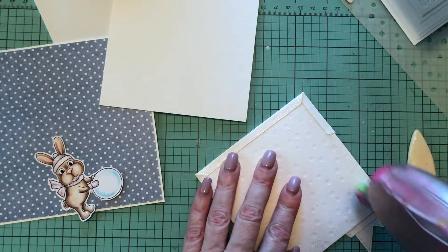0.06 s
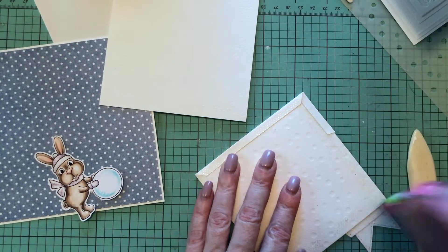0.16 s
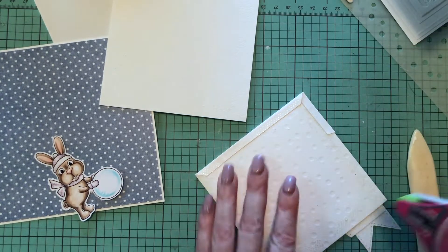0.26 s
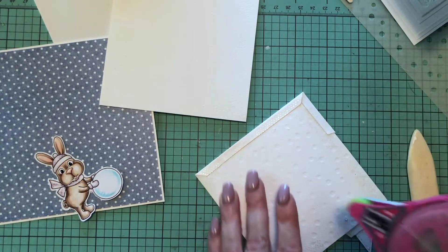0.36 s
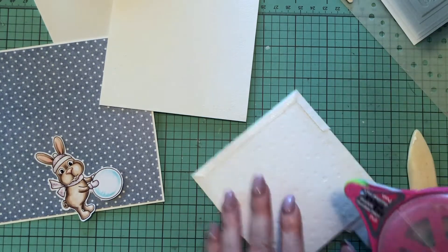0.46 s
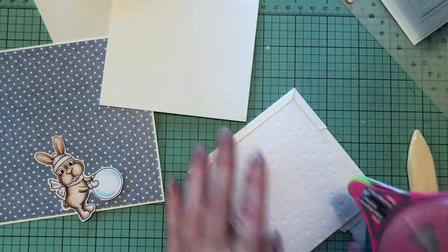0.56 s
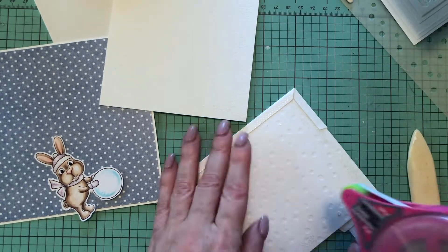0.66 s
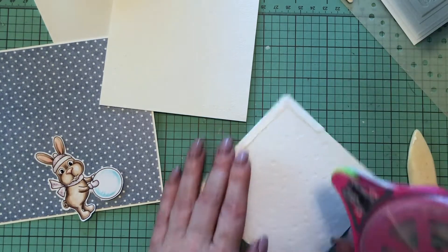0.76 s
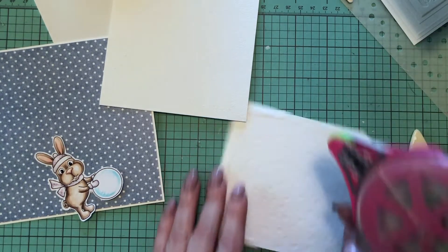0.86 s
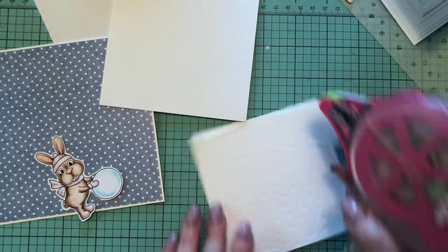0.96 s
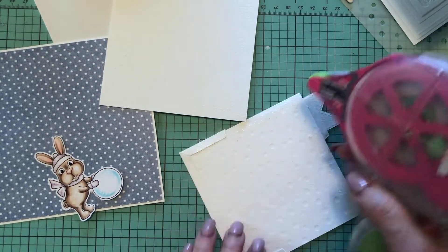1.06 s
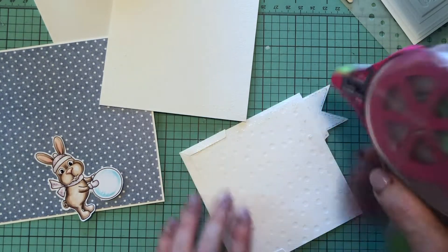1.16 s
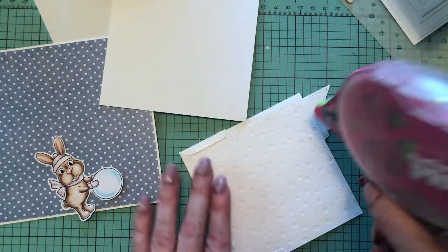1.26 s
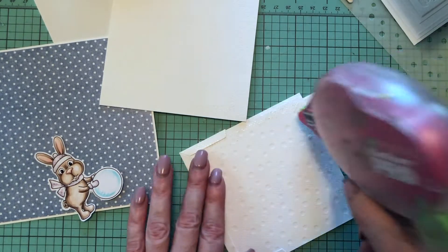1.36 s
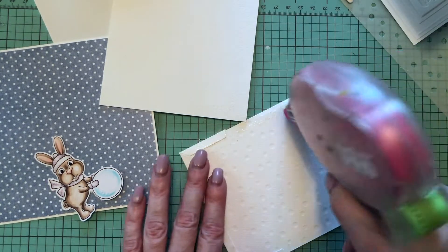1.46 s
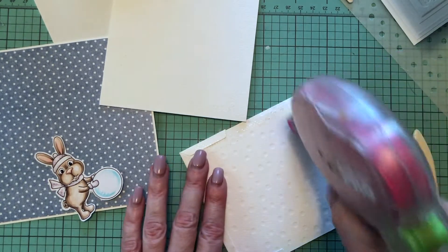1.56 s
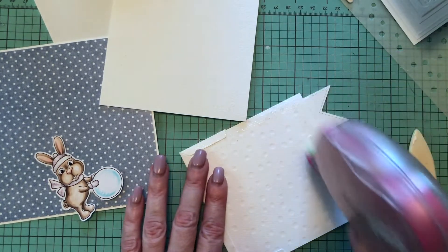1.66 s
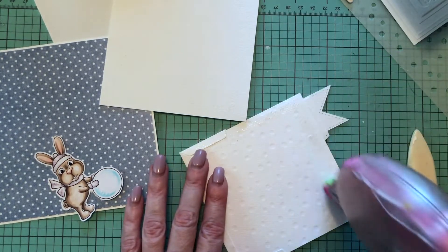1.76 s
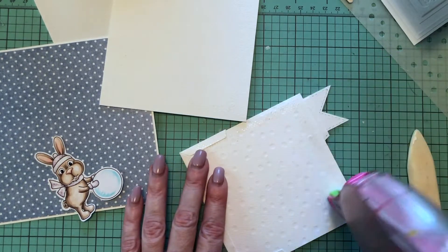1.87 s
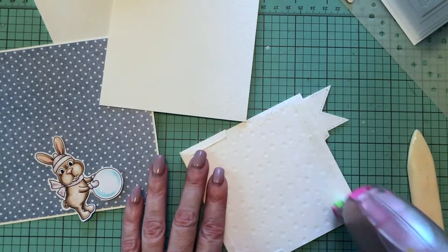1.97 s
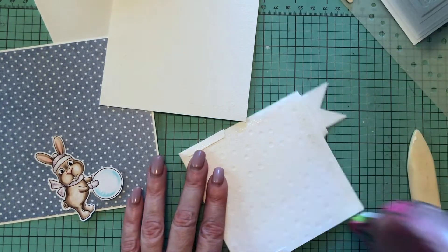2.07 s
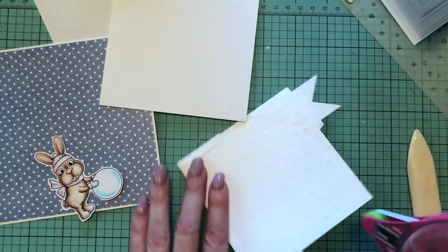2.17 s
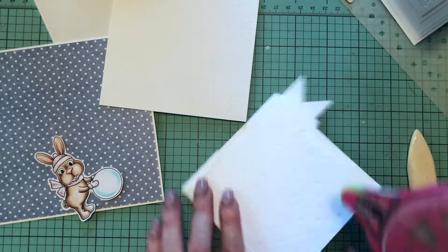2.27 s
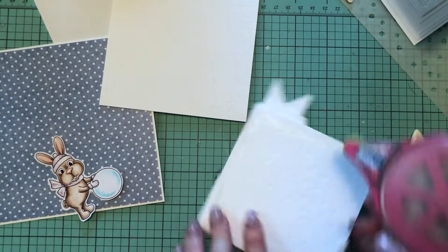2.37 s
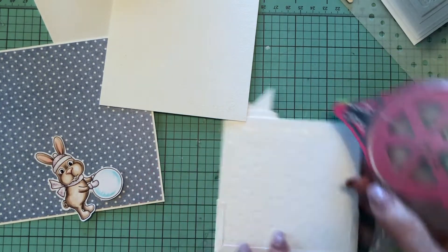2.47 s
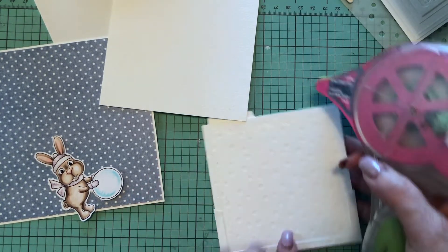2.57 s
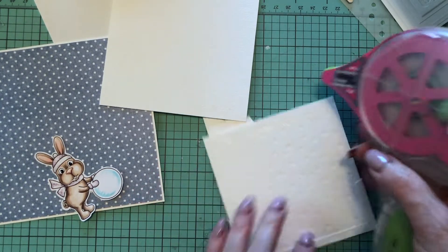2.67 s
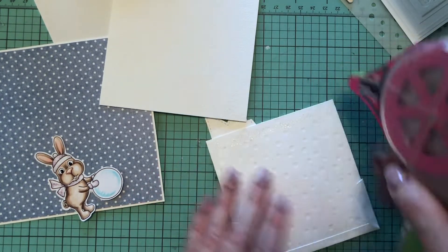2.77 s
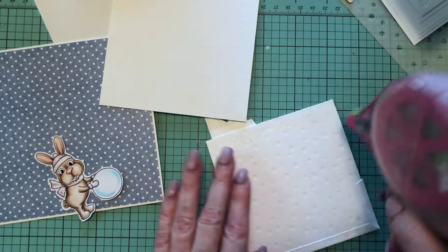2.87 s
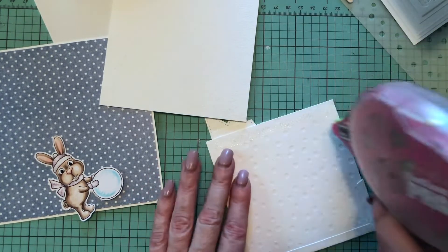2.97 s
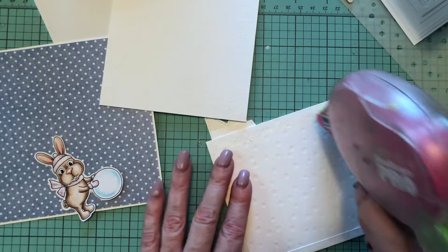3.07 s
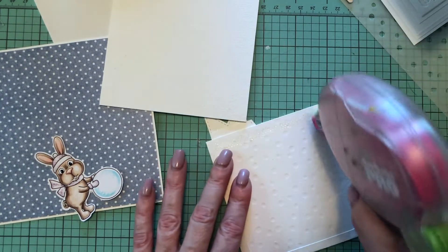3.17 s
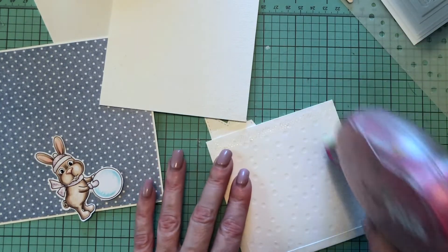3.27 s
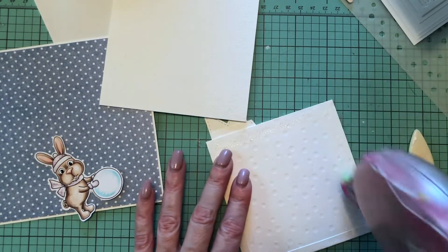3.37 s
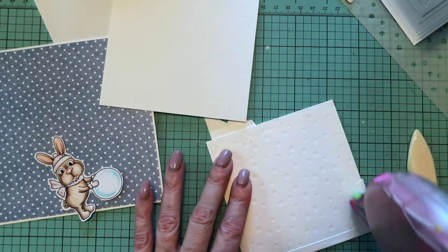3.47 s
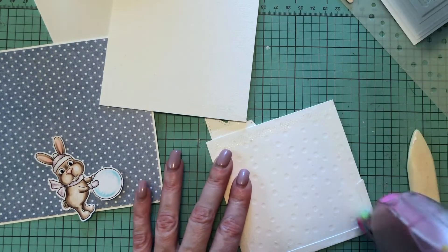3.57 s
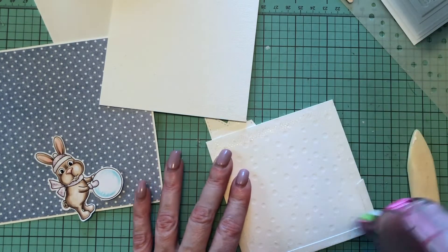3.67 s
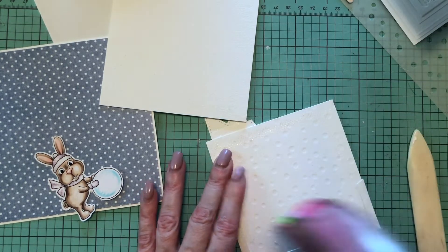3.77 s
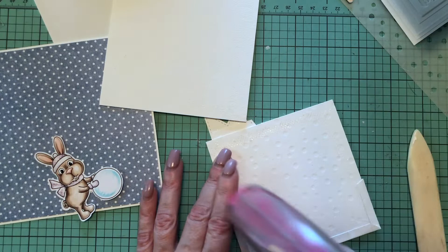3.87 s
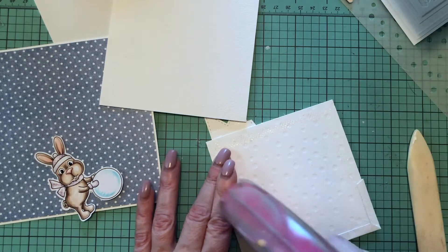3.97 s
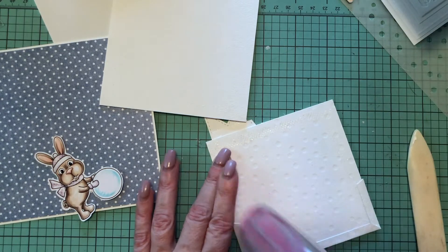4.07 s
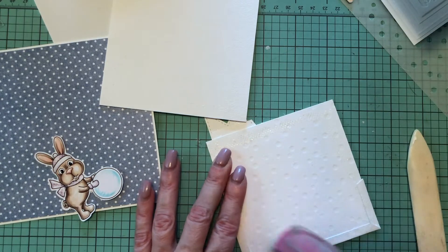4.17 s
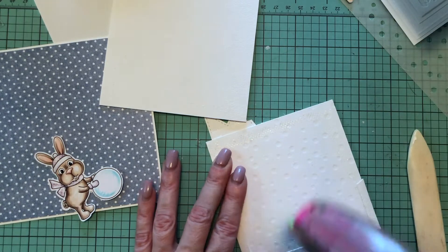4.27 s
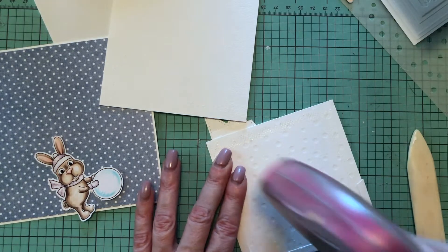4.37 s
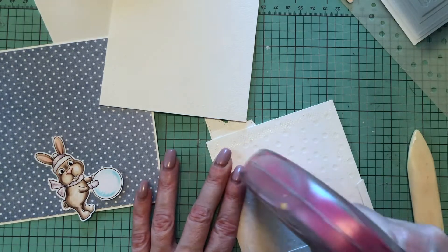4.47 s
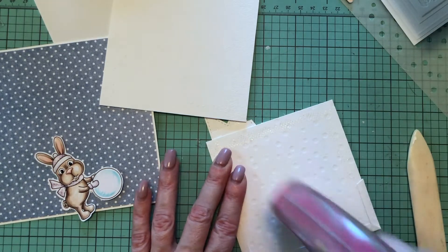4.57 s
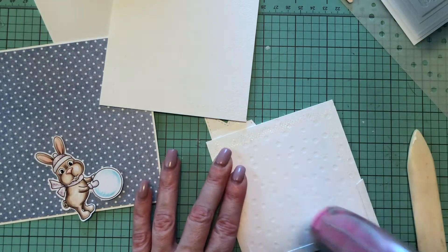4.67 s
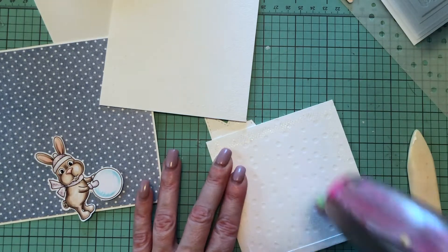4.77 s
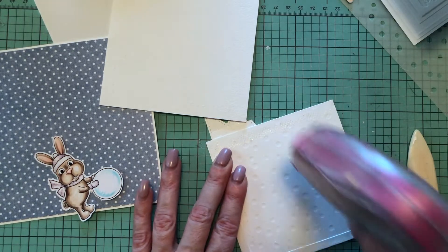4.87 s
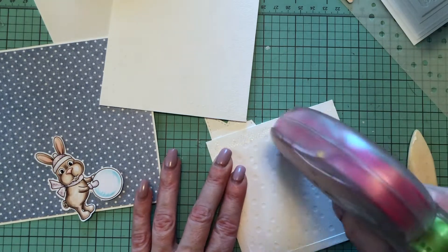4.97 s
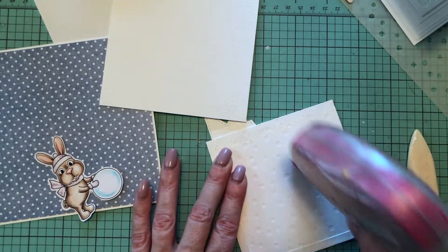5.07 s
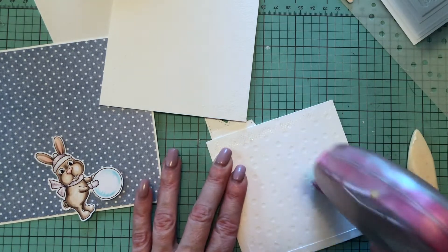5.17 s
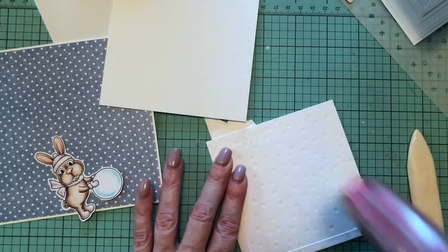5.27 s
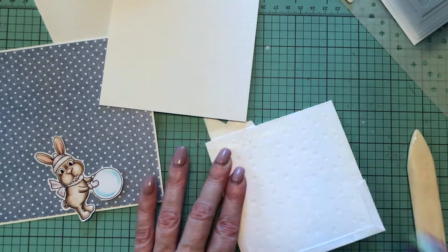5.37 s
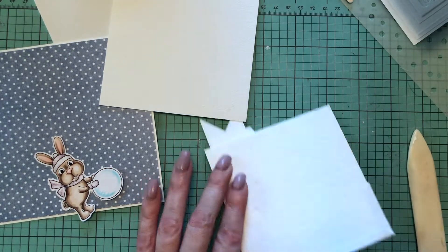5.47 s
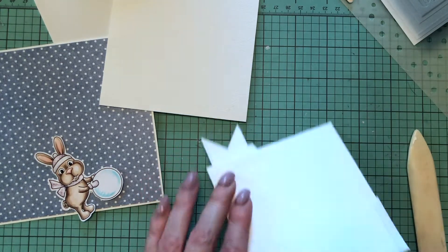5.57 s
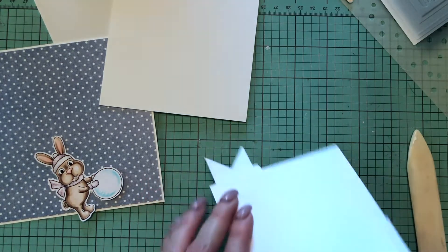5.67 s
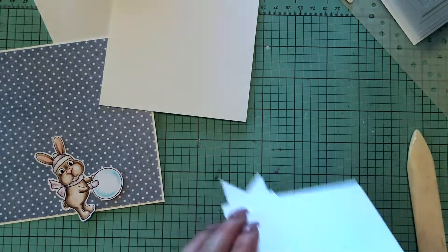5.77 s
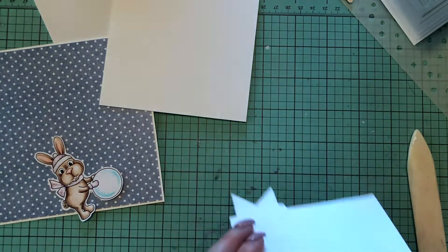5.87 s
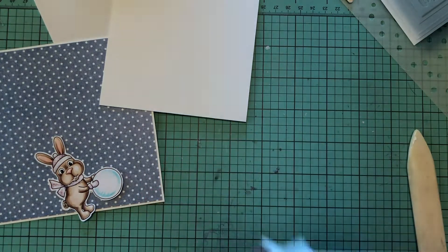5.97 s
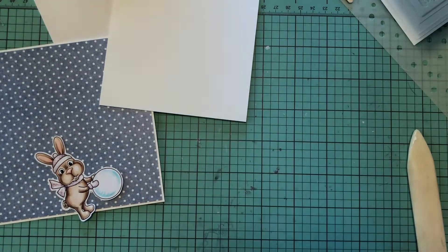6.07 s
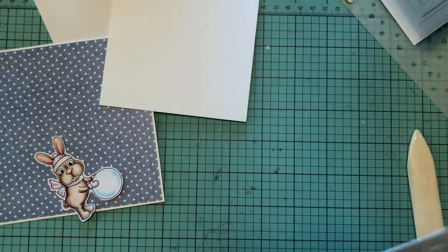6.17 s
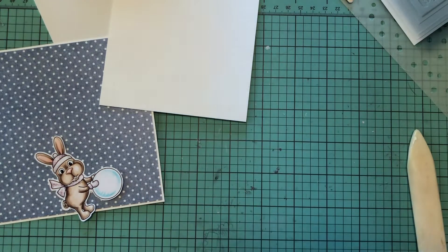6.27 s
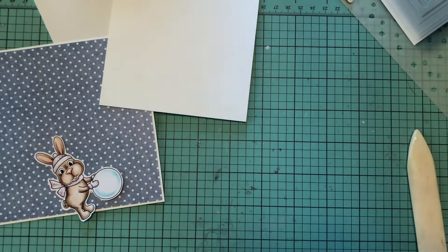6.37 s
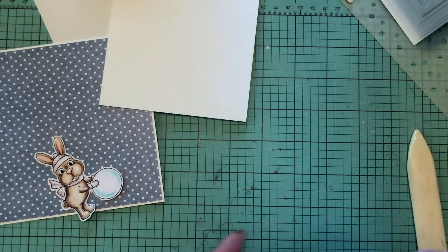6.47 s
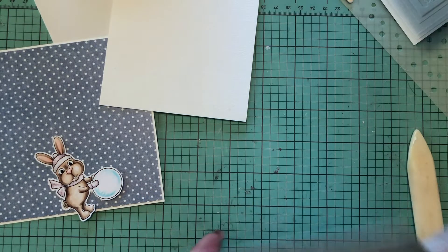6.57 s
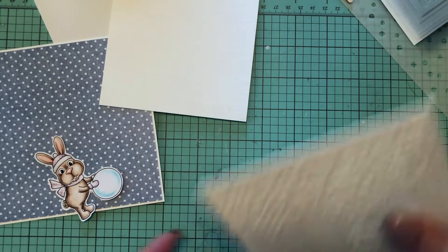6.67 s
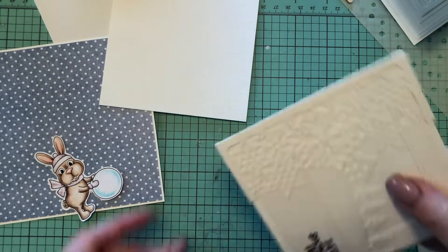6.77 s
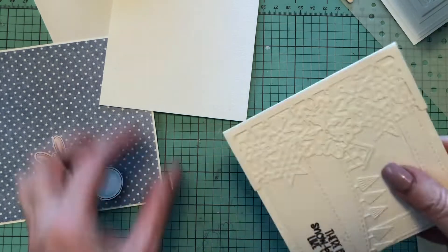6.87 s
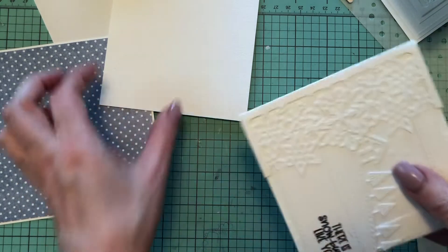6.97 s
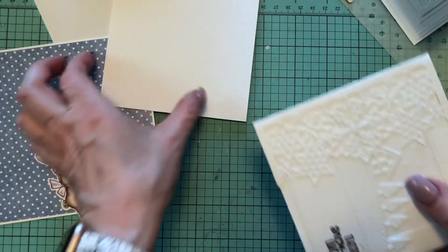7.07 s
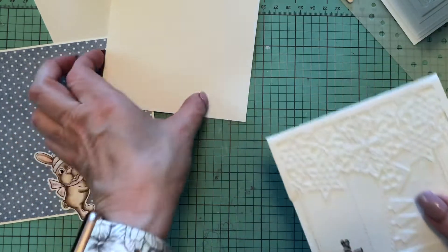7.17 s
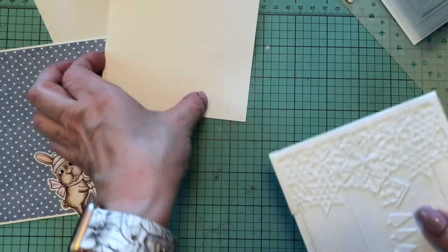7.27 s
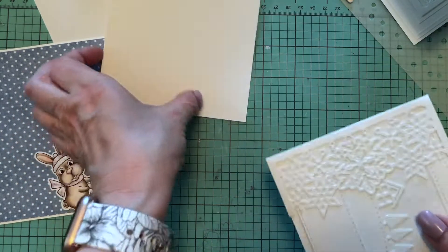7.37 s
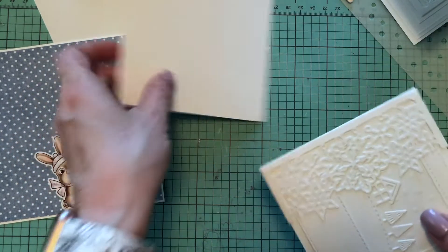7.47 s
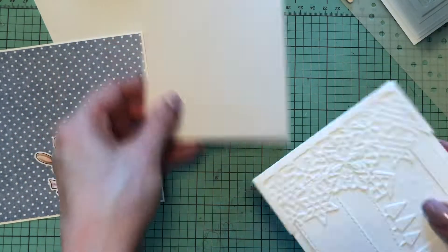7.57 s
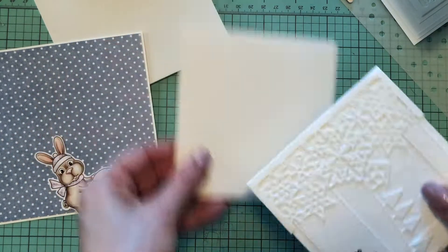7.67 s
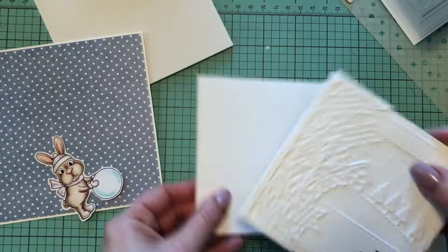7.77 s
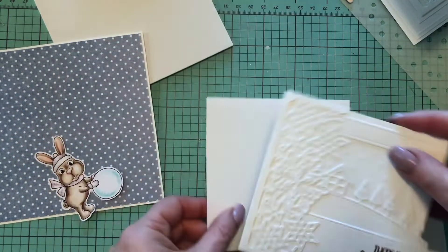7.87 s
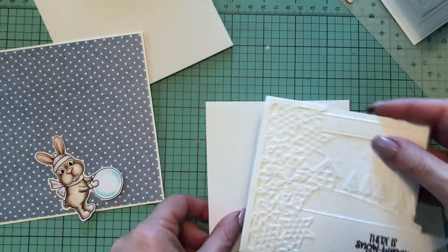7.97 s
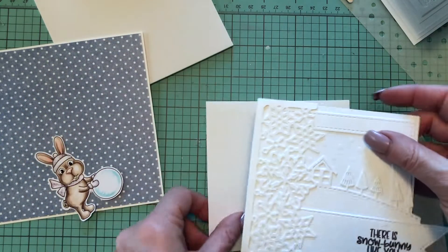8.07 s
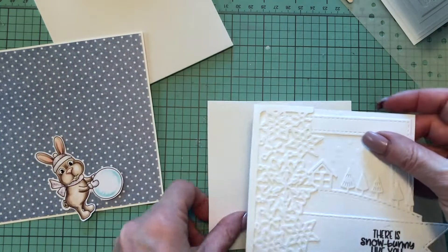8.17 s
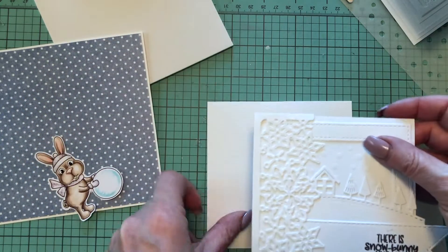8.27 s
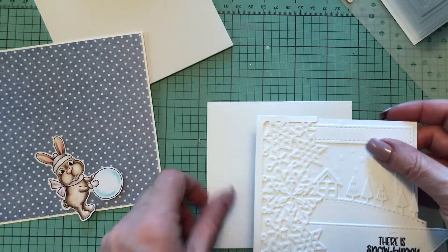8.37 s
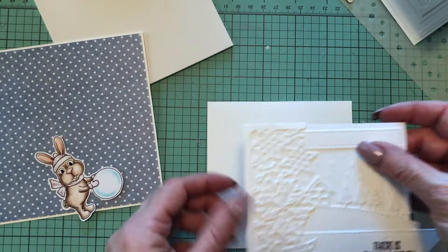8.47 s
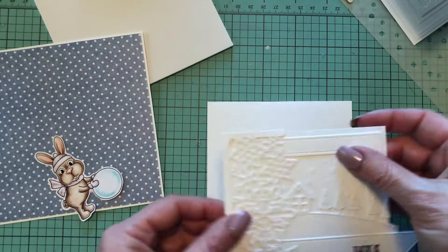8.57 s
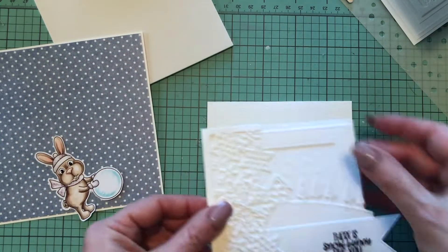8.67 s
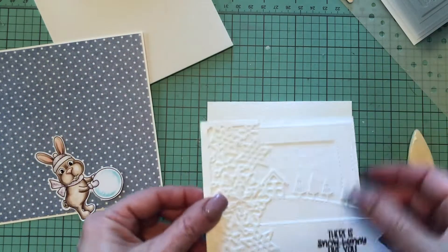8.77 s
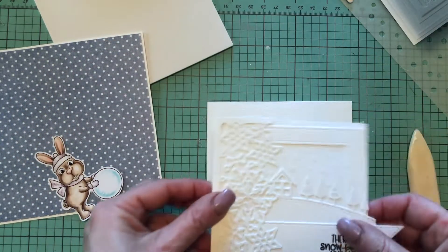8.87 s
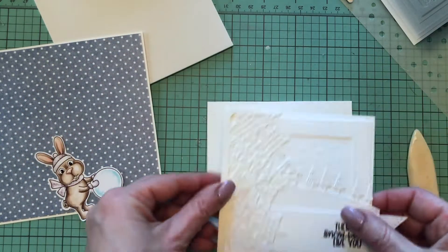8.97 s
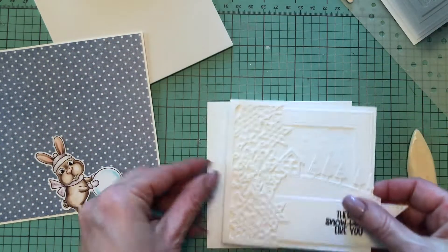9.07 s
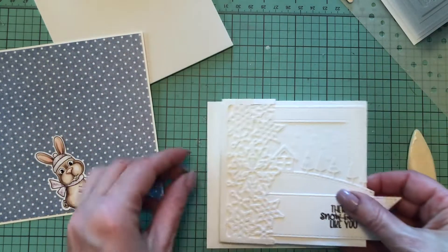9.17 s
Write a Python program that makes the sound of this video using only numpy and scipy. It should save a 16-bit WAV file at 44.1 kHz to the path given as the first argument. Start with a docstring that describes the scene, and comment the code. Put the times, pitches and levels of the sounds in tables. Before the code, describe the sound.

A close microphone in a small, quiet room, with a faint steady hush throughout. At 0 s a hollow plastic tape gun thuds onto card and makes a quick ratcheting zip, ending in a click at about 0.2. Card taps and brushes softly as it is turned, from 0.2 to 1.3. Two more zips follow at 1.5 to 2.1, gritty with peeling tape. Card slides and knocks from 2.1 to 3.0. Five short strokes come between 3.15 and 5.3, most starting with a woody thump and rattling teeth, with small taps between. At 5.45 sharp card snaps and hollow plastic knocks sound, strongest near 5.7 and 5.9. Scattered taps run from 6.3 to 6.9. A bright, short paper scrape stands out at 7.45, then gentler sliding until 8.3, with crisp edge taps and light table bumps at 8.3, 8.6 and 8.9.

```python
"""On a craft table in a small quiet room, a plastic tape gun lands on cardstock and rolls along its edges, close up.
Its gear teeth are noise clicks that ring the hollow housing, and tape peels as grainy noise; the table thuds in
low decaying modes. Cards slide as patchy noise with a moving resonance, and tap and snap as short noise puffs.
A decaying noise tail answers as the room, over a steady hush."""
import sys
import numpy as np
from scipy import signal
from scipy.fft import rfft, irfft, next_fast_len
from scipy.io import wavfile
from scipy.ndimage import uniform_filter1d

SR = 44100
rng = np.random.default_rng(int(sys.argv[2]) if len(sys.argv) > 2 else 0)


def pcm_store(signal):
    """Save signal as 16-bit PCM."""
    levels = np.round(np.clip(np.atleast_2d(signal), -1, 1) * 32767)
    wavfile.write(sys.argv[1], SR, levels.astype(np.int16).T)


N = 407043  # samples in the scene

# Spectrum of the steady hush. Each row: frequency in Hz, relative level in dB.
HUSH_SPECTRUM = [(18, -44), (30, 16), (106, 7), (227, 0.5), (461, -3), (962, -7.5), (14800, -24),
                 (16000, -18)]
# Room decay. Each row: frequency in Hz, time to fall by 60 dB in seconds.
ROOM_DECAY = [(150, 0.56), (1500, 0.37), (14000, 0.11)]
# Low modes of the table top. Each row: frequency in Hz, relative level in dB, time to fall by 60 dB in seconds.
TABLE_MODES = [(97, 6.5, 0.17), (142.5, 5, 0.11), (209, 3.5, 0.093), (295.6, -3, 0.08),
               (344.6, -5.5, 0.079), (505, -18, 0.067)]
# Resonances of the hollow housing. Each row: frequency in Hz, width in Hz, relative level in dB.
HOUSING_MODES = [(731, 64, 9.5), (865, 58.5, 17), (967, 107, 14), (1185, 158, 8.5), (2200, 280, -9.5)]
# Colour of clicks and peeling tape. Each row: frequency in Hz, relative level in dB.
GEAR_COLOUR = [(1000, 2), (2000, 6), (4200, 3.5), (6000, 4), (9900, -3), (14000, -4.5), (16000, -2)]

# Cards sliding on the mat. Each row: start in seconds, gathering, steady and slowing times in seconds,
# relative level in dB, treble slope in dB per octave at full speed, card resonance in Hz at the start and at the end.
CARD_SLIDES = [(.17, 0.032, 0.19, .02, -47, -0.5, 2500, 2900),
               (0.348, 0.022, 0.044, 0.14, -42, -4.5, 2550, 3700),
               (.46, 0.051, 0.016, 0.019, -39, -8, 4000, 4500),
               (0.698, 0.046, 0.1, 0.37, -28, -8, 3350, 4700), (.75, .1, .225, .06, -30.5, 1, 2800, 2600),
               (2.128, 0.096, .28, 0.081, -31.5, -21, 4540, 3500),
               (2.298, 0.099, 0.094, 0.086, -34, 2.5, 2330, 950),
               (2.596, 0.068, 0.055, 0.068, -29, -5, 2970, 2400),
               (5.438, 0.013, 0.08, 0.29, -38, -13, 3100, 2400),
               (5.718, 0.009, 0.017, 0.23, -35, -8, 2720, 2900),
               (5.9, 0.018, 0.024, 0.12, -42.5, 4, 3100, 4300),
               (6.222, 0.011, 0.17, .16, -42.5, -3, 3240, 2900),
               (6.683, 0.11, 0.013, 0.048, -33.5, -4, 2770, 2150),
               (7.322, 0.081, 0.032, 0.018, -33.5, -5.5, 3300, 3300),
               (7.428, 0.044, 0.04, 0.028, -16, -3.5, 1850, 1730),
               (7.5, 0.044, 0.025, 0.17, -32, -2, 1750, 1600),
               (7.788, 0.015, 0.076, 0.088, -28, -6.5, 1860, 2100),
               (7.86, .03, .14, 0.026, -33, -8.5, 2230, 3000),
               (8.068, 0.029, 0.072, 0.022, -38.5, -11, 2780, 3000),
               (8.169, 0.045, 0.064, 0.027, -30.5, -10, 3350, 3200),
               (8.95, 0.061, 0.02, 0.013, -35, -11, 1500, 1430)]
# Nails, card edges, tacky glue, the gun laid down. Each row: time in seconds, body level in dB, body pitch in Hz,
# relative crack level in dB.
CARD_TAPS = [(0.244, -21, 2400, -27), (5.42, -21.5, 3750, -61), (7.195, -23, 2800, -54),
             (7.567, -18, 1530, -43), (7.835, -15, 2000, -34), (7.962, -19.5, 1040, -43),
             (3.753, -29.5, 3055, -27), (3.827, -30, 3120, -40), (0.358, -23, 1090, -20),
             (0.448, -22, 3380, -33), (0.674, -10, 3400, -43), (1.246, -21.5, 2600, -59),
             (2.351, -17, 2220, -31), (2.438, -19.5, 1930, -9), (2.45, -9.5, 1980, -17),
             (2.486, -9.5, 2250, -31), (2.877, -18, 2280, -36), (2.978, -15.5, 3150, -58),
             (3.799, -25, 1260, -15), (4.306, -19, 1890, -54), (5.444, -10.5, 2500, -39),
             (5.455, -10.5, 3340, -33), (5.606, -13.5, 4500, -26), (5.722, -1, 1750, -21),
             (5.899, 0, 4560, -4), (5.915, -7.5, 5030, -9), (6.312, -9, 1970, -14),
             (6.348, -20.5, 1010, -24), (6.375, -17, 3160, -16), (6.412, -18.5, 1020, -11),
             (6.442, -9, 2940, -9), (6.614, -20, 2380, -24), (6.624, -21.5, 4076, -14),
             (6.828, -18.5, 2320, -40), (6.883, -9.5, 1140, -18), (7.113, -23, 2730, -51),
             (7.143, -9.5, 3440, -31), (7.283, -16, 2800, -25), (7.7, -25.5, 1540, -55),
             (8.268, -7.5, 3340, -29), (8.277, -15.5, 2600, -42), (8.569, -10, 1200, -45),
             (8.592, -15.5, 1140, -44), (8.898, -9, 1600, -42.5), (8.909, -28, 1110, -23)]
# Hands bumping the table. Each row: time in seconds, relative thud level in dB, hardness in dB per octave.
HAND_BUMPS = [(0.356, -19, 5), (0.674, -23.5, 7.5), (5.724, -21.5, 16), (5.904, -16.5, 12),
              (7.166, -21.5, 1.5), (7.287, -33.5, 8.5), (7.684, -29.5, 10), (8.277, -27.5, 10.5),
              (8.597, -29, -8), (8.905, -25.5, -14)]

# The gun's nose meets the card and bounces once. Each row: time in seconds, relative thud level in dB,
# hardness in dB per octave, click level in dB, bounce delay in seconds, relative bounce click level in dB.
NOSE_LANDINGS = [(0.0, -16.5, 1, -22.5, 0.025, -11.5), (1.5, -16.5, -6.5, -27, 0.019, -26.5),
                 (1.917, -14.5, 4, -18, 0.027, -11.5), (3.15, -15.5, 0.5, -22, .011, -22),
                 (3.962, -11.5, 3, -17, 0.027, -19), (4.461, -16, 5, -20.5, 0.024, -13),
                 (4.995, -12.5, 3.5, -17, 0.024, -16)]
# Pulls of the gun. Each row: full roll from in seconds, stop in seconds, relative tape hiss level in dB,
# relative housing rumble level in dB, relative stop click level in dB.
GUN_PULLS = [(0.062, 0.169, -39, -39, -18), (1.575, 1.787, -37, -30, -25), (1.97, 2.0754, -41, -34, -14),
             (3.218, 3.415, -39.5, -31, -18.5), (3.526, 3.647, -38, -33.5, -46),
             (4.038, 4.236, -38.5, -33, -20.5), (4.544, 4.711, -35, -30, -27),
             (5.07, 5.2597, -38, -29.5, -16.5)]
# Runs of evenly slipping teeth. Each row: first click in seconds, last click in seconds, approximate gap in seconds,
# relative click level in dB.
TOOTH_RUNS = [(0.0595, 0.1497, .018, -21), (1.626, 1.683, .0175, -20), (3.257, 3.375, .0165, -28),
              (3.576, 3.627, .024, -18), (4.0612, 4.15, .017, -15.5), (4.6657, 4.696, .015, -12.5)]
# Single teeth letting go. Each row: time in seconds, relative click level in dB.
TOOTH_SLIPS = [(1.5726, -18), (1.603, -21.5), (1.812, -27), (3.2068, -18), (3.215, -24), (3.239, -28),
               (4.2187, -28), (4.55, -26), (4.583, -16), (4.6287, -16), (5.045, -21.5), (5.0894, -17.5),
               (5.164, -27.5)]
# The hollow shell knocked in the hand or on the table. Each row: time in seconds, strike level in dB.
SHELL_KNOCKS = [(2.879, 1.5), (5.445, 9.5), (5.458, 8.5), (5.724, 16), (5.9, 13), (5.915, 4)]

LEAD = 0.008  # s from the start of a noise puff to its loudest moment
START_S, STOP_S = 0.11, 0.067  # s for a pull to get under way and to run out
REST_DB = 41.5  # dB lost between the full roll and rest
HISS_GAIN_DB, RUMBLE_GAIN_DB = 3.5, -1  # dB of rise over a pull; negative falls
FAINT_DB, DULL_DB = 21, 6  # a slide at its ends: dB of level and dB per octave of treble slope lost
SPREAD = 0.1395  # delay of a bending wave in the table, s times the root of Hz
TOP_HZ = 15900  # band limit


def amp(db):
    """Gain of a level in dB."""
    return 10 ** (np.asarray(db) / 20)


def unit(x):
    """x at rms 1."""
    return x / np.sqrt(np.mean(x ** 2) + 1e-20)


def along(points, hz):
    """Reads a curve of (Hz, value) points on a log frequency axis."""
    point_hz, values = np.transpose(points)
    return np.interp(np.log(hz + 1), np.log(point_hz + 1), values)


def filtered(x, response):
    """x times a complex response of frequency."""
    size = next_fast_len(len(x) + SR // 2)
    spectrum = rfft(x, size) * response(np.fft.rfftfreq(size, 1 / SR))
    return irfft(spectrum, size)[:len(x)]


def modes(peaks):
    """Causal response of (Hz, width, dB) resonances with alternating signs."""
    def response(f):
        total = 0
        for k, (centre, width, db) in enumerate(peaks):
            resonance = 1j * f * width / (centre * centre - f * f + 1j * f * width)
            total = total + (-1) ** k * amp(db) * resonance
        return total
    return response


def tinted(x, hz, width):
    """x through one broad resonance; width is a share of its pitch."""
    return signal.lfilter(*signal.iirpeak(hz, 1 / width, SR), x)


def grit(rate, spread_db, life):
    """Noise in random bursts: rate a second, sizes scattered, each decaying with a time constant of life seconds."""
    sizes = amp(spread_db * np.minimum(rng.exponential(size=N), 2))
    kicks = (rng.random(N) < rate / SR) * sizes
    envelope = signal.lfilter([1], [1, -np.exp(-1 / (life * SR))], kicks)
    return unit(rng.standard_normal(N) * envelope)


def patchy(x, depth_db, tall, long):
    """Spectrogram of x with patches of random gain, tall bins by long frames."""
    f, t, z = signal.stft(x, SR, nperseg=256)
    field = uniform_filter1d(rng.standard_normal(z.shape), tall, axis=0)
    field = uniform_filter1d(field, long, axis=1)
    return f, t, z * amp(depth_db * unit(field))


def unpatched(z):
    """Spectrogram back to sound."""
    return signal.istft(z, SR, nperseg=256)[1]


def add(track, s, sound):
    """Mixes a sound in at s seconds; what falls before the start is lost."""
    at = round(s * SR)
    track[max(at, 0):][:len(sound) + min(at, 0)] += sound[max(-at, 0):]


def burst(rise, life):
    """A short puff of noise with peak 1, swelling in before its loudest moment."""
    t = np.arange(SR // 40) / SR
    envelope = np.exp(np.minimum((t - LEAD) / rise, (LEAD - t) / life))
    puff = rng.standard_normal(len(t)) * envelope
    return puff / np.abs(puff).max()


def motion(t, start, gather, steady, slow):
    """Speed of one movement from 0 to 1: gathers, holds, runs out (seconds each)."""
    end = start + gather + steady + slow
    return np.clip(np.minimum((t - start) / gather, (end - t) / slow), 0, 1)


def hush():
    """Steady air and microphone noise, shaped by its spectrum."""
    noise = filtered(rng.standard_normal(N), lambda hz: amp(along(HUSH_SPECTRUM, hz)))
    return amp(-46.5) * unit(noise)


def room(x):
    """Each frequency of the room's answer dies at its own speed."""
    hz, t, z = signal.stft(rng.standard_normal(SR // 2), SR, nperseg=256)
    tail = unpatched(z * amp(-60 * t / along(ROOM_DECAY, hz)[:, None]))
    delayed = np.pad(x, (150, 0))  # samples
    return signal.fftconvolve(delayed, tail / np.linalg.norm(tail))[:N]


def thud(db, tilt_db, attack):
    """The table top rings its low modes at new strengths; harder contact favours the upper ones (dB per octave)."""
    t = np.arange(SR // 2) / SR
    lowest_hz = TABLE_MODES[0][0]
    ring = np.zeros(len(t))
    for k, (hz, level, t60) in enumerate(TABLE_MODES):
        own_db = rng.normal(0, 2)
        moved = rng.normal(0, 0.05)  # share of pitch, varied at random from thud to thud
        strength = level + own_db + tilt_db * np.log2(hz / lowest_hz)
        ring += (-1) ** k * amp(strength - 60 * t / t60) * np.sin(2 * np.pi * hz * (1 + moved) * t)
    return amp(db) * ring * (1 - np.exp(-t / attack))


def drag():
    """Anything dragged over the table shakes its low modes; noise through them, at rms 1."""
    # twice the width that the free ring times imply
    board = modes([(hz, np.log(1000) / np.pi / t60 * 2, db) for hz, db, t60 in TABLE_MODES])
    return unit(filtered(rng.standard_normal(N), board))


def slides():
    """Paper fibres rub on the mat: patchy grit, a moving card resonance, a faint drag in the table, stray crackles."""
    rub = unit(grit(rate=3100, spread_db=3, life=0.002) + 0.6 * rng.standard_normal(N))
    f, t, z = patchy(rub, 1.5, tall=6, long=10)
    colour, level, moving = np.zeros(z.shape), np.zeros(len(t)), np.zeros(len(t))
    for start, *seconds, db, treble_db, from_hz, to_hz in CARD_SLIDES:
        speed = motion(t, start, *seconds)
        on = speed > 0
        slow = 1 - speed[on]
        centre = np.interp(t[on], [start, start + sum(seconds)], [from_hz, to_hz])
        card = amp(4) / (1 + ((f[:, None] - centre) / (0.09 * centre)) ** 2)
        above = np.log2(f[:, None] / centre + 0.0025)  # octaves over the resonance
        bass_db = np.minimum(7 * above, 0)
        slope_db = treble_db - DULL_DB * slow  # slower rubs are duller
        broad = amp(bass_db + slope_db * np.maximum(above - 0.7, 0))
        loudness = amp(db - FAINT_DB * slow)
        colour[:, on] += loudness * (card + broad)
        level[on] += loudness
        moving[on] = 1
    sheet = unpatched(z * colour)[:N]
    # the card creases at any speed
    crackles = tinted(grit(rate=30, spread_db=3, life=0.001), 4000, width=2.5)
    level, moving = (np.interp(np.arange(N) / SR, t, curve) for curve in (level, moving))
    return sheet + amp(-16) * level * drag() + amp(-50.5) * moving * crackles


def taps():
    """A dull body at the pitch of the card that gives, longer for larger pieces, and a bright crack; hands thud."""
    out, push = np.zeros((2, N + SR))
    for s, db, hz, crack_db in CARD_TAPS:
        body = tinted(burst(rise=0.00075, life=4.3 / hz), hz, width=0.61)
        body = amp(db) * body / np.abs(body).max()
        crack = np.diff(burst(rise=0.00028, life=0.0025), prepend=0)  # differencing brightens
        add(out, s + 0.00106 - LEAD, body + amp(crack_db - 3.5) * crack)
        push[round(s * SR)] = amp(db) * (1000 / hz) ** 2  # larger pieces push the table harder
    for s, db, hard_db in HAND_BUMPS:
        add(out, s, thud(db - 13.0, tilt_db=hard_db, attack=0.0053))

    def bending(hz):
        """Bending waves in the table: lows arrive late."""
        phase = -4 * np.pi * SPREAD * (np.sqrt(hz) - hz / 80)
        return np.exp(1j * phase) / (1 + (hz / 500) ** 2)

    return out[:N] + amp(24.5) * filtered(push[:N], bending)


def rolling(column, gain_db):
    """Level of a layer that follows the pulls and changes by gain_db along each."""
    t = np.arange(N) / SR
    level = np.zeros(N)
    for row in GUN_PULLS:
        begin, stop = row[:2]
        speed = motion(t, begin - START_S, START_S, stop - begin, STOP_S)
        to_go = np.clip((stop - t) / (stop - begin), 0, 1)
        level += (speed > 0) * amp(row[column] - gain_db * to_go - REST_DB * (1 - speed))
    return level


def teeth():
    """(s, dB) of every tooth click: bounces, runs, single slips and the jolt that ends a pull."""
    bounces = [(row[0] + row[4], row[5]) for row in NOSE_LANDINGS]
    runs = []
    for first, last, gap, db in TOOTH_RUNS:
        count = round((last - first) / gap) + 1
        runs += [(s, db) for s in np.linspace(first, last, count)]
    jolts = [(row[1], row[4]) for row in GUN_PULLS]
    return bounces + runs + list(TOOTH_SLIPS) + jolts


def peeling():
    """The glue film tears in fine grains over a sparser rattle of small teeth and loose spools."""
    glue = grit(rate=900, spread_db=2, life=0.001)
    rattle = grit(rate=110, spread_db=3, life=0.002)
    grains = patchy(glue + 0.7 * rattle, 3, tall=14, long=2)[2]  # the colour changes from grain to grain
    return unit(unpatched(grains)[:N])


def tape_gun():
    """Teeth click and knock the housing; the peeling tape crackles; rolling shakes housing and table."""
    hiss, rumble = rolling(2, HISS_GAIN_DB), rolling(3, RUMBLE_GAIN_DB)
    clicks, knocks, raps, table = np.zeros((4, N + SR))
    for s, db in teeth():
        click = np.diff(burst(rise=0.0009, life=0.0013), prepend=0)
        click += 2 * tinted(click, rng.uniform(4000, 15000), width=0.25)  # each tooth has its own tone
        add(clicks, s + 0.0023 - LEAD, amp(db - 2.5) * click)
        strike = amp(db + 20.5 + rng.normal(0, 2.2)) * rng.choice([-1, 1])
        knocks[round((s + 0.002) * SR)] += strike  # the shell is struck with the click
    for s, db, hard_db, click_db, *_ in NOSE_LANDINGS:
        add(table, s + 0.0019, thud(db - 1.0, tilt_db=hard_db, attack=0.00031))
        add(clicks, s + 0.001616 - LEAD, amp(click_db) * burst(rise=0.0017, life=0.0094))
        knocks[round((s + 0.003) * SR)] += amp(db + 23.0)
    for s, db in SHELL_KNOCKS:
        raps[round(s * SR)] = amp(db)

    peel = peeling()
    shell = modes(HOUSING_MODES)

    def shell_from_outside(hz):
        """Knocked from outside, the upper modes ring more."""
        return shell(hz) * (hz / 1000) ** 2 / (1 + (hz / 1500) ** 4)

    bright = filtered(clicks[:N] + hiss * peel, lambda hz: amp(along(GEAR_COLOUR, hz) + 8))
    housing = rumble * unit(filtered(peel, shell)) + filtered(knocks[:N], shell)
    housing += filtered(raps[:N], shell_from_outside)
    return bright + housing + amp(-2.0) * rumble * drag() + table[:N]


def scene():
    """Gun and cards close by, the cards exciting the room less, over the hush."""
    gun, knocks, rubs = tape_gun(), taps(), slides()
    to_room = amp(-10.5) * gun + amp(-13) * knocks + amp(-12.5) * rubs
    return (gun + knocks + rubs + room(to_room) + hush())[None]


def record(dry):
    """The small microphone loses the deep bass and rounds off the highest peaks; nothing stays above the band limit."""
    heard = filtered(dry[0], lambda hz: (1j * hz / 60 / (1 + 1j * hz / 60)) ** 3)
    heard = heard / (1 + np.abs(heard / 0.75) ** 4) ** (1 / 4)  # peaks level off towards 0.75
    return filtered(heard, lambda hz: np.clip((TOP_HZ - hz) / 150, 0, 1))[None]


dry = scene()
out = record(dry)
pcm_store(out)
```